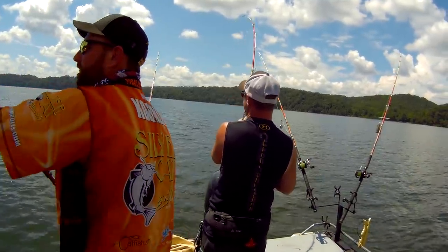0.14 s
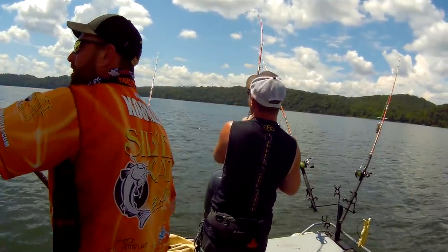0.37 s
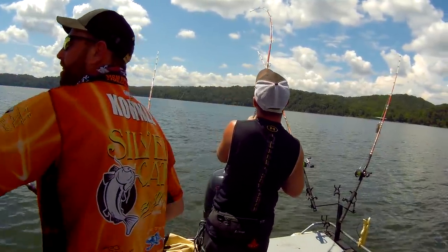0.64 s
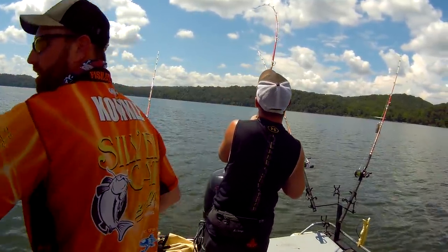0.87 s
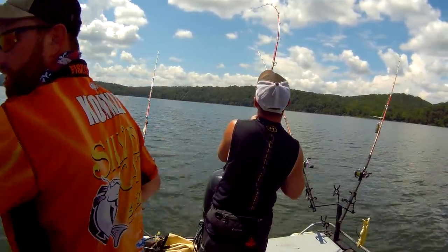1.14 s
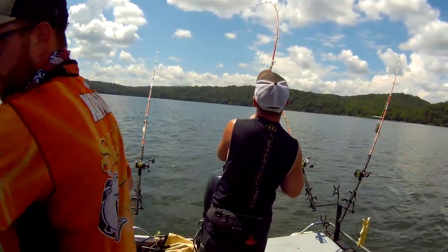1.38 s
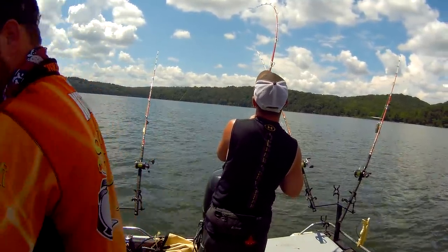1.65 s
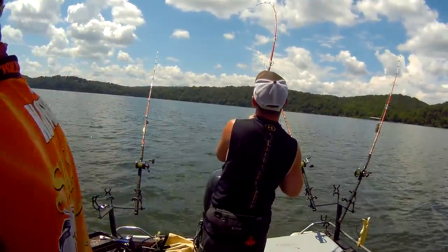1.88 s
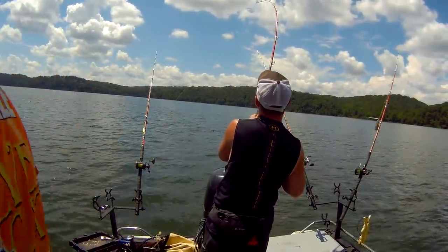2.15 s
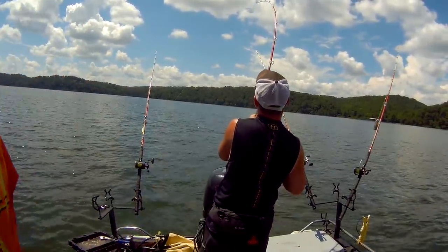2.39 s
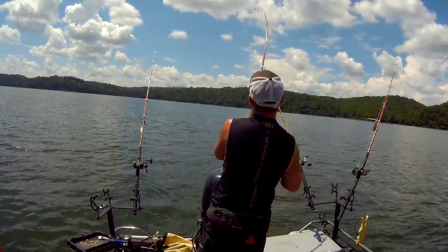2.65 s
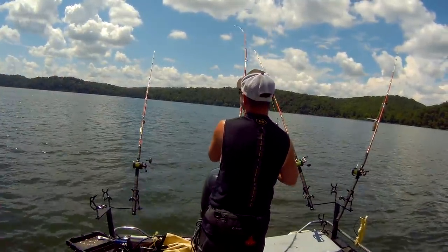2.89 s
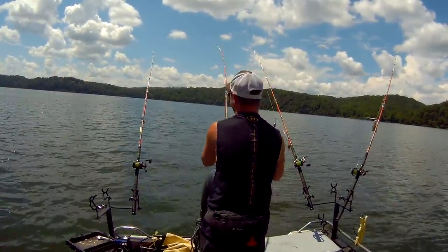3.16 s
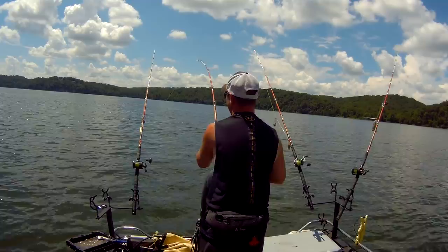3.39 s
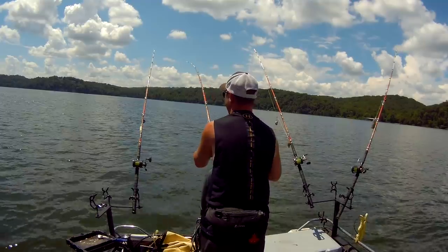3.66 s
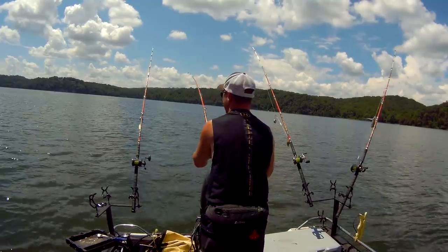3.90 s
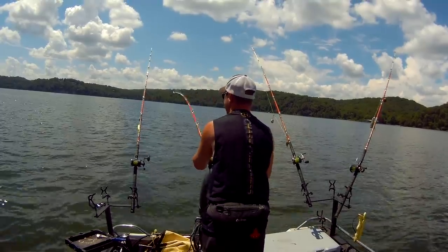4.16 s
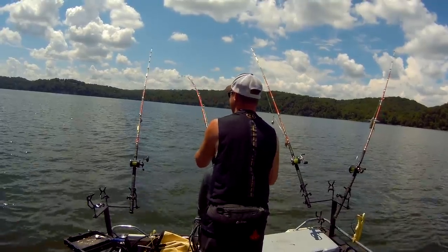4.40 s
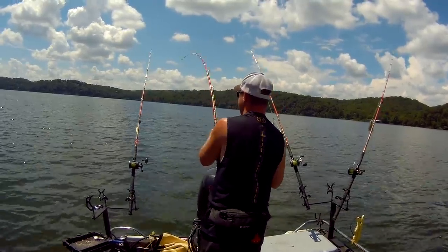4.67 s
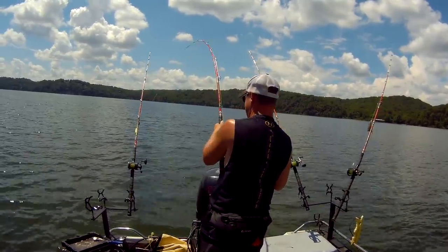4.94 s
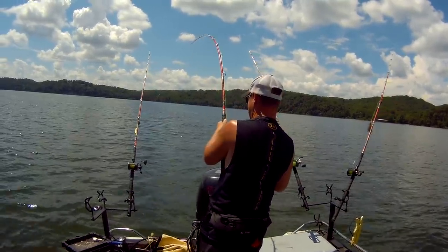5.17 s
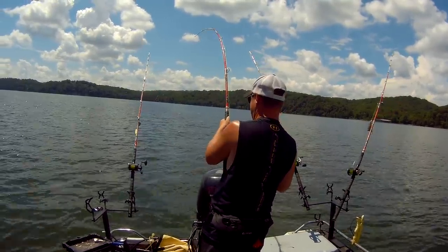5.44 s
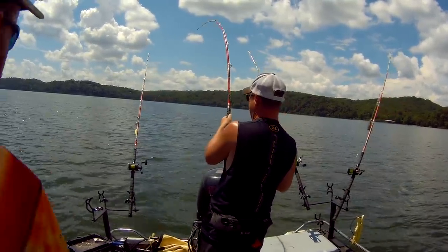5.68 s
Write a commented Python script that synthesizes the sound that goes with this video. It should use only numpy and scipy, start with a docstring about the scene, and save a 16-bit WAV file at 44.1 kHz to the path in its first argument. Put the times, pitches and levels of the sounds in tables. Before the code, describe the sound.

Dry, hollow drag creaks, sharp jerks and two brief squeaks come in clusters between quiet gaps of soft wind rumble and hull water.

```python
"""Wind thumps a microphone on an open boat over hull water, hiss and a thin whine, shaped as noise and tones.
Bumps are brief low pressure cycles; ticking tackle is dying noise put through hard resonances.
A loaded drag washer creaks by stick and slip, ringing a hollow body and a taut line; twice its slips come
evenly and squeak. The line also hums in soft swells. The camera's noise suppressor follows the level of the
bumps, ticks and drag: in their quiet it turns down hiss and whine most, water and wind less."""
import sys
import numpy as np
from scipy import signal
from scipy.fft import rfft, irfft, next_fast_len
from scipy.io import wavfile
from scipy.ndimage import uniform_filter1d, map_coordinates

SR = 44100
rng = np.random.default_rng(int(sys.argv[2]) if len(sys.argv) > 2 else 0)


def dump(signal):
    """Clip the signal to [-1, 1] and save it as 16-bit WAV at the path in sys.argv[1]."""
    limited = np.clip(np.atleast_2d(signal).T, -1, 1)
    pcm = np.round(limited * 32767).astype(np.int16)
    wavfile.write(sys.argv[1], SR, pcm)


def natural_amplitude(level_db):
    """Convert a level in decibels to a linear amplitude factor, elementwise."""
    exponent = np.asarray(level_db, float) / 20
    return 10 ** exponent


N = 255954


def unit(x):
    """Normalisation: the signal scaled to rms 1."""
    return x / np.sqrt(np.mean(x ** 2) + 1e-20)


def curves(rows):
    """Linear interpolation: one value per sample for each column after the time."""
    s, *columns = np.transpose(rows)
    return [np.interp(np.arange(N) / SR, s, column) for column in columns]


def wobble(rate_hz):
    """Slow random modulation: a smooth curve through rate_hz random knots a second."""
    knots = rng.standard_normal(int(N * rate_hz / SR) + 4)
    return map_coordinates(knots, [np.arange(N) * rate_hz / SR])


def filtered(x, response):
    """Linear filtering: the spectrum of x times a complex response of frequency."""
    m = next_fast_len(N + SR // 2)
    return irfft(rfft(x, m) * response(np.fft.rfftfreq(m, 1 / SR)), m)[:N]


def coloured(spectrum):
    """Spectral shaping: white noise given a spectrum, joined over log frequency, at rms 1."""
    f, db = np.transpose(spectrum)

    def response(hz):
        return natural_amplitude(np.interp(np.log(hz + 1), np.log(f + 1), db))

    return unit(filtered(rng.standard_normal(N), response))


def ring(x, modes):
    """Modal resonance: causal modes of alternating sign, scaled to keep the level of steady white noise."""
    def response(f):
        total = 0
        for k, (centre, width, db) in enumerate(modes):
            mode = 1j * f * width / (centre * centre - f * f + 1j * f * width)
            total = total + (-1) ** k * natural_amplitude(db) * mode
        return total

    impulse = np.arange(N) == 0
    return filtered(x, response) / np.linalg.norm(filtered(impulse, response))


def suppressor(events):
    """Envelope following: a gain in dB that opens faster than it closes and rests 11.5 dB down in quiet."""
    shut_db, open_db, depth_db = -59.5, -29, 11.5
    opens_s, closes_s = 0.029, 0.056
    step = 128  # samples
    power = np.abs(uniform_filter1d(events ** 2, size=512))[::step]
    level_db = 10 * np.log10(power + 1e-12)
    wanted = np.clip((level_db - shut_db) / (open_db - shut_db), 0, 1)
    states, opening = [], 0.7
    for w in wanted:
        opening += (w - opening) * step / SR / (opens_s if w > opening else closes_s)
        states.append(opening)
    opening = np.interp(np.arange(N), step * np.arange(len(states)), states)
    return depth_db * (opening - 1)


# Wind and water levels before suppression: start_s, wind_level_db, water_level_db
AIR_LEVELS = [(0, -52.5, -48), (.5, -51, -57.5), (.78, -52, -44), (1.2, -54, -58), (1.5, -57, -57),
              (1.9, -50.5, -60), (2.3, -50, -49.5), (2.75, -51.5, -58), (3.1, -50.5, -58.5),
              (3.45, -54.5, -57), (3.85, -53.5, -57), (4.05, -49.5, -72), (4.4, -52.5, -58),
              (4.9, -56, -58.5), (5.3, -52, -58), (5.8, -56.5, -55)]
# Relative spectral density of wind at the microphone: frequency_hz, density_db (per Hz)
WIND_SPECTRUM = [(12, -34.5), (20, -1), (113, -5), (152, -6), (197, -9), (300, -17.5), (390, -53.5),
                 (660, -120)]


def wind(gain_db):
    """Turbulent pressure: low noise made lumpy by two random modulations, under a weak share of the gain."""
    level_db, _ = curves(AIR_LEVELS)
    lumps = natural_amplitude(2.2 * wobble(9) + 1.3 * wobble(30))
    return natural_amplitude(level_db + 0.46 * gain_db) * unit(lumps * coloured(WIND_SPECTRUM))


# Relative spectral density of water through the hull: frequency_hz, density_db (per Hz)
WATER_SPECTRUM = [(120, -38), (200, -9.5), (474, -5), (531, -4), (613, -6.5), (754, -7), (833, -11),
                  (1100, -24), (1430, -52), (2420, -120)]


def water(gain_db):
    """Filtered turbulence: unsteady noise as heard through the hull, under part of the gain."""
    _, level_db = curves(AIR_LEVELS)
    return natural_amplitude(level_db + 0.6 * gain_db + 0.96 * wobble(16)) * coloured(WATER_SPECTRUM)


# Relative spectral density of the camera's hiss: frequency_hz, density_db (per Hz)
HISS_SPECTRUM = [(530, -40), (900, -12.5), (1130, -7.5), (2470, -11.5), (4310, -10.5), (5600, -12),
                 (6600, -11.5), (7800, -12), (9200, -7.5), (10800, -13), (12400, -14), (14000, -7.5),
                 (16000, -18)]


def hiss(gain_db):
    """Broadband noise: shaped noise, -51.5 dB before the full gain, that wavers slightly."""
    return natural_amplitude(gain_db - 51.5 + 0.8 * wobble(6.1)) * coloured(HISS_SPECTRUM)


# Whine tones before wavering and suppression: pitch_hz, level_db (rms)
WHINE_TONES = [(6857, -62), (13714, -59)]


def whine(gain_db):
    """Pure tones: steady sines that waver together in level, under the full gain."""
    t = np.arange(N) / SR
    tones = sum(natural_amplitude(db) * np.sqrt(2) * np.sin(2 * np.pi * hz * t) for hz, db in WHINE_TONES)
    return natural_amplitude(gain_db + 0.72 * wobble(3.2)) * tones


# Dull bumps through the hull and ringing knocks: start_s, envelope_peak_db, pitch_hz, cycles_to_peak (count)
BUMP_EVENTS = [(.004, -37.5, 290, 1.2), (1.053, -46, 230, 1.3), (1.081, -40, 222, 0.85),
               (1.338, -39.5, 151, 0.3), (1.503, -31, 394, 0.75), (1.653, -43, 580, 5.3),
               (1.905, -48, 620, 2), (2.542, -30, 174.4, 0.96), (2.847, -37, 72, 0.27),
               (2.92, -37, 108, 0.73), (2.942, -39, 227, 1.5), (3.0, -49, 45.5, 0.31),
               (3.032, -31, 38.3, 0.44), (3.046, -34, 177, 0.42), (3.072, -36, 110, 0.51),
               (3.129, -33.5, 265, 0.45), (3.133, -30.5, 88.5, 0.37), (3.17, -51.5, 143, 0.44),
               (3.575, -46, 594, 2.2), (5.077, -43.5, 416, 0.64), (5.275, -40.5, 223, 1.7)]


def bumps():
    """Damped oscillation: a few low pressure cycles that swell to a peak and die away."""
    out, t = np.zeros(N + SR), np.arange(SR // 8) / SR
    for start_s, peak_db, hz, cycles in BUMP_EVENTS:
        u = t * hz / cycles  # time in units of the rise to the peak
        envelope = natural_amplitude(peak_db) * u * np.exp(1 - u)
        out[round(start_s * SR):][:len(t)] += envelope * np.sin(2 * np.pi * hz * t)
    return out[:N]


def slips(rate_hz, jitter_db, scatter_db, grit, first_slip_db):
    """Stick-slip friction: one impulse per slip, uneven in pace and size, over rubbing noise; rms 1."""
    pace, size, noise = rng.standard_normal((3, SR // 10))[:, :len(rate_hz)]
    held_pace = pace[np.arange(len(rate_hz)) // 100]  # each value holds for 100 samples
    count = np.cumsum(rate_hz * natural_amplitude(jitter_db * held_pace)) / SR
    slip = np.diff(np.floor(count), prepend=-1) > 0
    size_db = np.where(count < 1, first_slip_db, scatter_db * size[count.astype(int)])
    return unit(unit(slip * natural_amplitude(size_db)) + grit * noise)


def add_burst(force, start_s, length_s, first_db, last_db, low_db, treble_db, line_db):
    """Impulsive excitation: one burst of slips drives body and line, at levels relative to the middle modes."""
    n = max(round(length_s * SR), 40)
    # a short burst must push harder to build up the same ring
    envelope = natural_amplitude(np.linspace(first_db, last_db, n)) * np.sqrt(1 + 0.002 * SR / n)
    train = slips(np.full(n, 320.), jitter_db=2.5, scatter_db=1.5, grit=0.24, first_slip_db=-1)
    push = np.linalg.norm(envelope) / np.sqrt(n) * unit(envelope * train)
    # harder slips take a larger share of the treble
    sharp = np.std(push) * unit(push * np.abs(push) ** 0.6)
    # rows: low, middle and high modes, then the line's tone and upper tone
    levels = natural_amplitude([[low_db], [0], [treble_db], [low_db - 5.5], [line_db - 10]])
    force[:, round(start_s * SR):][:, :n] += levels * [push, push, sharp, push, push]


# Resonances of the hollow body in three groups: pitch_hz, width_hz, relative_level_db
LOW_MODES = [(366.6, 28, -11.5), (432, 32, -11), (560, 50, -11), (672.8, 21.6, 5), (828, 47, -6.5)]
MIDDLE_MODES = [(1007, 114, 4), (1123, 53, 9.5), (1236, 38.5, 3.5), (1328, 56, -3), (1598, 71, 7),
                (1876, 120, -5.5), (2112, 74, -1)]
HIGH_MODES = [(2392, 92, 9.5), (2880, 57, 0), (3056, 240, -0.5), (3785, 370, -2.5), (4520, 130, -0.5),
              (6170, 480, -11.5), (8040, 400, -12)]
# Slowly dying lower and upper tones of the taut line: pitch_hz, width_hz, relative_level_db
LINE_TONES = [(755.4, 16, 0), (1539, 23, 0)]


def body_and_line(force):
    """Forced modal vibration: the slips' five forces ring the body's mode groups and the line's two tones."""
    groups = [LOW_MODES, MIDDLE_MODES, HIGH_MODES, LINE_TONES[:1], LINE_TONES[1:]]
    low, middle, high, tone, upper_tone = [ring(f[:N], modes) for f, modes in zip(force, groups)]

    # a slip takes a moment, which softens what lies above a corner
    def soft(corner_hz):
        return lambda hz: 1 / (1 + 1.4j * hz / corner_hz - (hz / corner_hz) ** 2)

    return filtered(low + middle + tone + upper_tone, soft(corner_hz=2330)) + filtered(high, soft(corner_hz=9600))


# Single jerks of the drag, drive levels: start_s, first_level_db (before the short-burst boost),
# low_ring_db (relative to middle), upper_line_db (relative to middle, before a 10 dB cut)
JERK_EVENTS = [(.012, -50, -5, -2), (.0757, -40.5, -3, 15), (.1299, -17, 1, -17), (.2766, -29, -1.5, -2),
               (.306, -26.5, 1.5, 3.5), (.465, -52.5, -10, 3), (.9108, -19.5, -3.5, -9),
               (1.047, -52, 8.5, -9), (1.328, -59, 3, 7), (1.3619, -30.5, -12, -11), (1.509, -57.5, 8, 6),
               (1.655, -43.5, -19, -19), (1.678, -58, -6, 6), (1.741, -62.5, -4, 5),
               (2.1093, -30.5, 0, -11), (2.128, -55.5, 22.5, -1), (2.166, -47, 7, 14),
               (2.196, -51, -4, 1.5), (2.939, -49.5, 19, 20.5), (3.4322, -39, 6, 0),
               (3.4606, -42.5, 9.5, 14), (3.619, -38, 1, 24), (4.263, -37, -0.5, -13),
               (4.3503, -37.5, -0.5, -12), (4.7128, -48, 2.5, 12.5), (4.741, -56, 13.5, 17),
               (4.773, -49, -2, 11), (5.077, -60, 7.5, 0), (5.2765, -46, 13.5, 8.5),
               (5.7582, -33.5, -10, 0)]


def jerks():
    """Stick-slip release: a few slips in 9 ms; harder jerks fade more and are brighter."""
    force = np.zeros((5, N + SR))
    for start_s, first_db, low_db, line_db in JERK_EVENTS:
        hardness_db = first_db + 35
        last_db = first_db - 13 - 0.5467 * hardness_db
        treble_db = -23.5 + 0.25 * hardness_db
        add_burst(force, start_s, 0.009, first_db, last_db, low_db, treble_db, line_db)
    return force


# Tackle ticks before the resonances: start_s, initial_level_db, t60_s
TICK_EVENTS = [(0.0198, -37, 0.021), (0.066, -31.5, 0.015), (0.0813, -24.5, 0.029), (0.099, -40, 0.017),
               (0.1286, -35.5, 0.019), (0.184, -44, 0.013), (0.243, -26.5, 0.038), (0.38, -33, 0.0022),
               (0.9097, -45, 0.02), (1.05, -32.5, 0.02), (2.109, -47, 0.018), (4.826, -45.5, 0.043),
               (4.9114, -29, 0.032)]
# Resonances of the small hard parts: pitch_hz, width_hz, relative_level_db
TACKLE_MODES = [(3200, 400, -17), (4550, 300, -3.5), (5860, 370, 0), (7620, 430, 2), (8750, 58, -13.5),
                (9130, 610, 4), (11450, 130, -44), (13400, 257, -24)]


def tackle():
    """Impact excitation: small hard parts tick as short dying noise puffs into their resonances."""
    out, t = np.zeros(N + SR), np.arange(SR // 20) / SR
    for start_s, level_db, t60_s in TICK_EVENTS:
        puff = natural_amplitude(level_db - 60 * t / t60_s) * rng.standard_normal(len(t))
        out[round(start_s * SR):][:len(t)] += puff
    return ring(out[:N], TACKLE_MODES)


# Creaking runs of slips, drive levels: start_s, length_s, first_level_db and last_level_db (before the
# short-burst boost), treble_db (relative to middle)
RUN_EVENTS = [(0.089, 0.0086, -54.5, -40, -16), (0.168, .029, -30.5, -24, -13.5),
              (0.204, 0.032, -45, -35, -24), (0.2392, 0.0091, -65, -14.5, -14),
              (0.532, .014, -47, -36.5, -35), (0.5547, 0.027, -36.5, -32.5, -22),
              (0.5952, 0.0067, -30.5, -28.5, -12), (0.615, .028, -30, -37.5, -39),
              (0.664, 0.019, -41, -38, -32), (0.6847, 0.023, -30.5, -49, -37.5),
              (0.7017, 0.019, -34, -42, -34), (0.724, .022, -27.5, -25, -21.5),
              (0.757, 0.029, -23.5, -27.5, -20), (0.786, 0.01, -27, -38, -14),
              (.807, .014, -19.5, -29.5, -14.5), (0.824, 0.0075, -22.5, -47, -18),
              (1.375, .021, -32, -31, -17.5), (2.2266, 0.03, -35.5, -30, -19),
              (2.3147, .021, -36, -20.5, -14.5), (2.472, 0.019, -37.5, -29, -17.5),
              (2.503, .02, -36, -27.5, -28), (2.54, .026, -29, -29.5, -19.5),
              (2.5724, 0.0081, -27.5, -39, -42), (2.62, 0.023, -52, -60.5, -18),
              (3.631, .027, -28, -20, -21.5), (3.661, 0.025, -18.5, -20, -14.5),
              (3.6909, 0.037, -19, -26.5, -10.5), (3.8776, 0.027, -27, -25, -14.5),
              (3.9018, .024, -31, -19.5, -15.5), (3.9317, 0.016, -29.5, -20.5, -18),
              (3.96, .043, -23.5, -26, -12), (4.0104, .04, -23, -31.5, -13),
              (4.056, 0.056, -24.5, -32.5, -18.5), (4.1133, .011, -29, -35.5, -44),
              (4.139, .024, -31, -31.5, -30), (4.16, 0.028, -27.5, -31, -13), (4.201, .0059, -29, -30, -15),
              (4.209, 0.0075, -37, -30.5, -15), (4.2218, 0.0063, -25.5, -33, -13),
              (4.236, 0.0049, -33, -44, -17), (4.827, 0.011, -43.5, -28, -10.5),
              (4.909, 0.029, -29.5, -30, -43), (4.9432, .027, -24.5, -31, -22),
              (4.979, 0.015, -24.5, -32, -13), (4.9988, 0.0029, -26.5, -20, -13.5),
              (5.011, 0.016, -24, -46, -11.5)]


def runs():
    """Repeated stick-slip: uneven creaks; louder runs ring the low modes less and the upper line tone more."""
    force = np.zeros((5, N + SR))
    for start_s, length_s, first_db, last_db, treble_db in RUN_EVENTS:
        hardness_db = max(first_db, last_db) + 25
        low_db = -9.5 - 0.24 * hardness_db
        line_db = -1 + 0.15 * hardness_db
        add_burst(force, start_s, length_s, first_db, last_db, low_db, treble_db, line_db)
    return force


# Hums of the taut line, several of them ringing on after a jerk or creak:
# middle_s, drive_level_db (rms), spread_s
LINE_HUM_SWELLS = [(.34, -55, 0.02), (.45, -53, 0.014), (0.949, -43, 0.0086), (1.11, -53, 0.072),
                   (1.9, -63, 0.022), (2.37, -52, .03), (2.45, -52, 0.022), (2.7, -60.5, 0.16),
                   (3.06, -57.5, 0.065), (3.498, -53.5, 0.0085), (4.359, -47.5, 0.02), (4.619, -62, 0.14),
                   (5.309, -68, 0.042)]


def line_hum():
    """Resonance: random drive in bell-shaped swells hums the line's lower tone."""
    t = np.arange(N) / SR
    swell = sum(natural_amplitude(db) * np.exp(-np.abs((t - s) / spread) ** 1.9) for s, db, spread in LINE_HUM_SWELLS)
    return ring(swell * rng.standard_normal(N), LINE_TONES[:1])


# Two squeaks, each a list of points: start_s, slip_rate_hz, drive_level_db (rms)
SQUEAK_PATHS = [
    [(2.254, 560, -36), (2.266, 575, -30), (2.278, 545, -22.5), (2.29, 505, -29), (2.312, 497, -37)],
    [(4.84, 372, -29), (4.858, 422, -28), (4.866, 410, -25), (4.878, 388, -28), (4.895, 410, -33),
     (4.908, 420, -34)],
]


def squeaks():
    """Periodic stick-slip: evenly spaced slips give a pitch, brightest where the squeak is loudest."""
    force = np.zeros((5, N + SR))
    for rows in SQUEAK_PATHS:
        start, end = round(rows[0][0] * SR), round(rows[-1][0] * SR)
        rate_hz, level_db = [c[start:end] for c in curves(rows)]
        push = natural_amplitude(level_db) * slips(rate_hz, jitter_db=0.1, scatter_db=1, grit=0.06, first_slip_db=0)
        sharp = push * natural_amplitude(0.99 * (level_db - level_db.max()))
        levels = natural_amplitude([[-13], [0], [-16], [-16], [-11]])
        force[:, start:end] += levels * [push, push, sharp, push, push]
    return force


def scene():
    """Superposition: all sounds add at one microphone; the events steer the gain of the background."""
    drag = body_and_line(jerks() + runs() + squeaks())
    events = bumps() + drag + tackle()
    gain_db = suppressor(events)
    background = wind(gain_db) + water(gain_db) + hiss(gain_db) + whine(gain_db) + line_hum()
    return (events + background)[None]


def roll_off(x):
    """The treble ends steeply here."""
    return signal.sosfilt(signal.butter(12, 16520, fs=SR, output="sos"), x)


def record(dry):
    """Single-channel pickup: the scene reaches the output as one finished mix."""
    return roll_off(dry)


dry = scene()
out = record(dry)
dump(out)
```